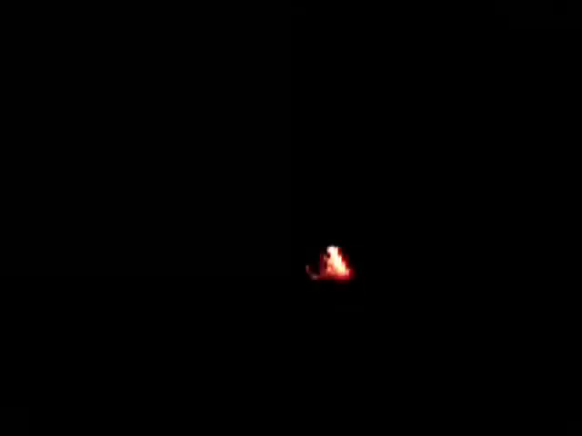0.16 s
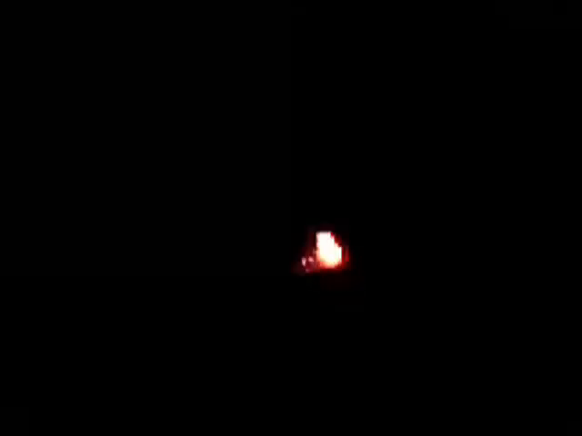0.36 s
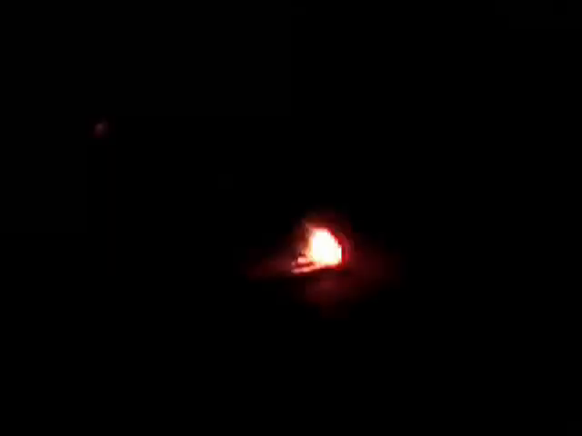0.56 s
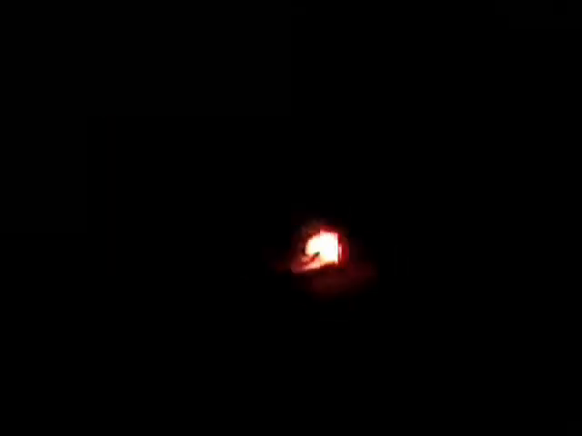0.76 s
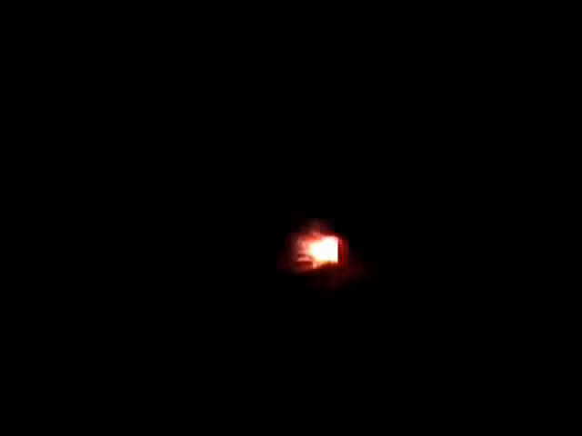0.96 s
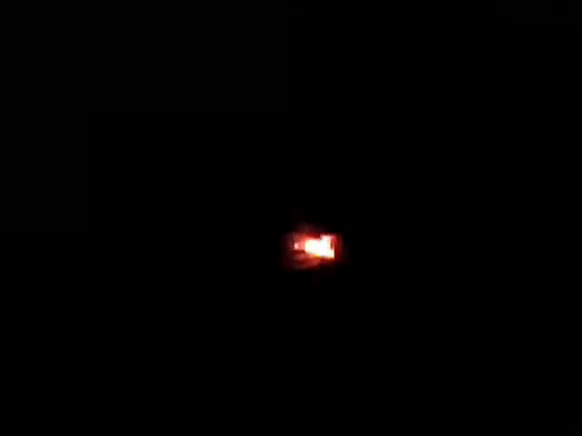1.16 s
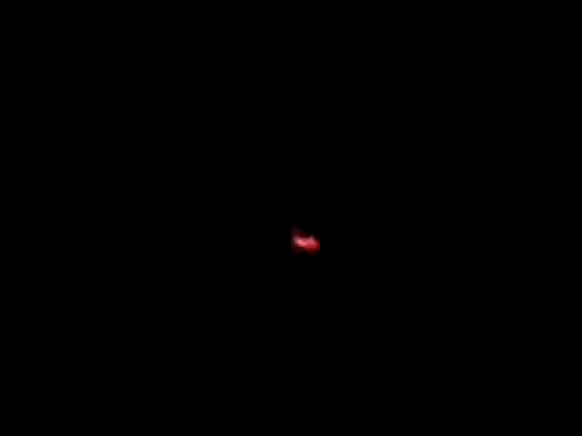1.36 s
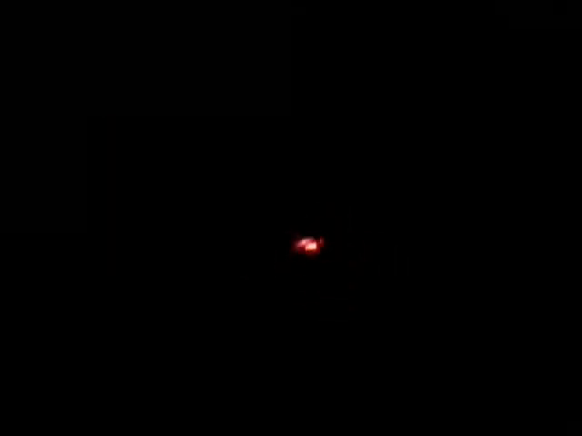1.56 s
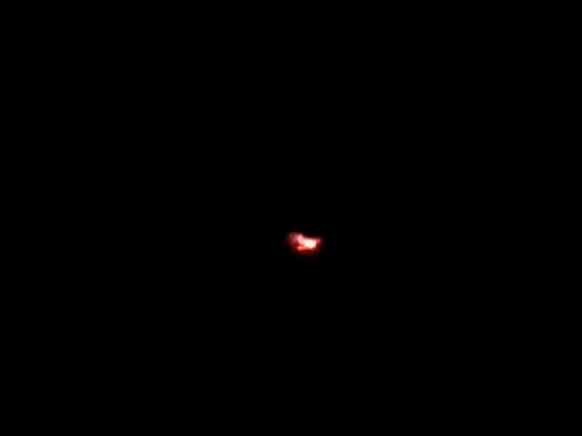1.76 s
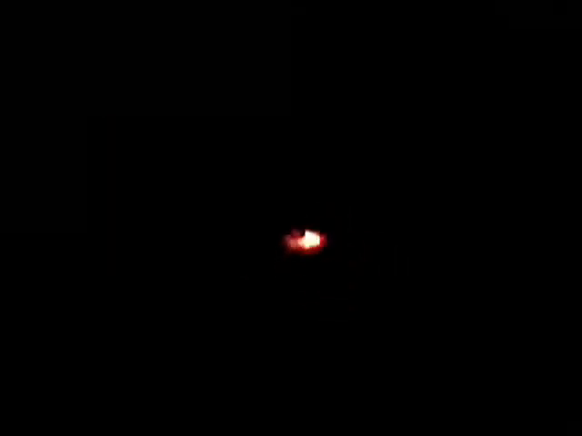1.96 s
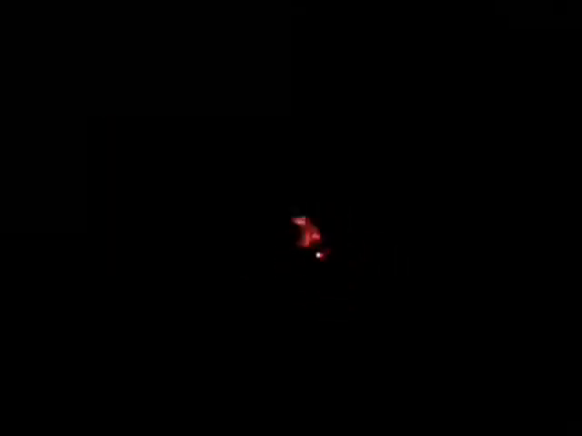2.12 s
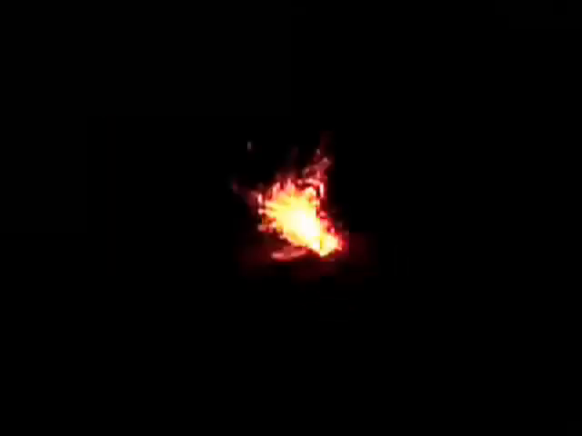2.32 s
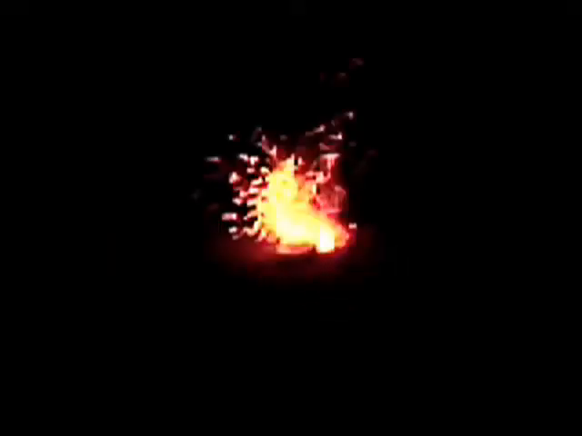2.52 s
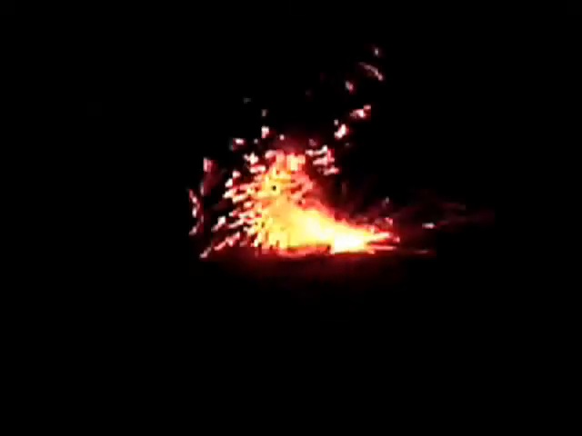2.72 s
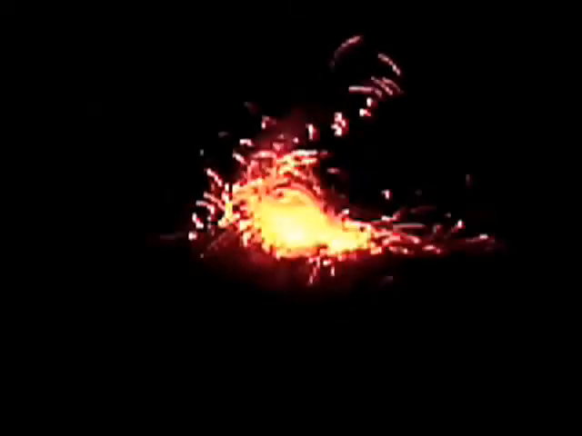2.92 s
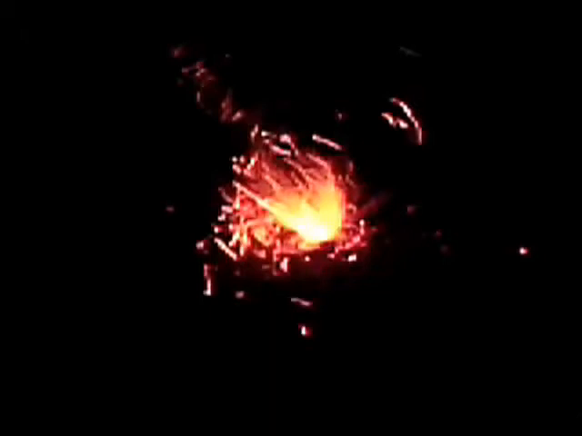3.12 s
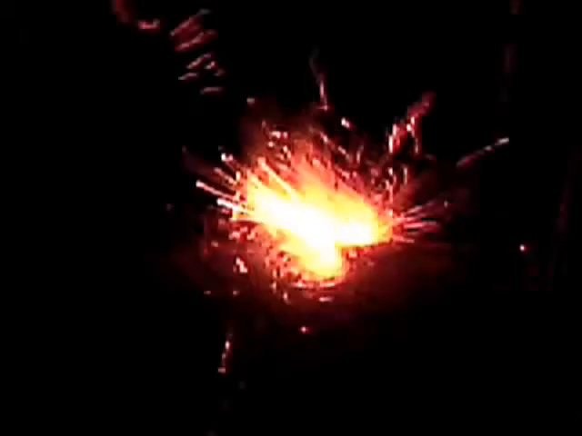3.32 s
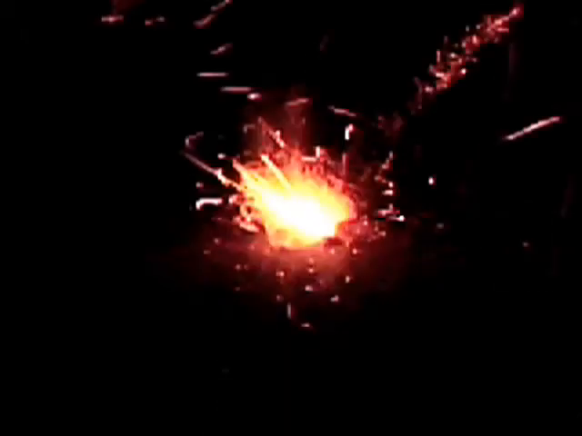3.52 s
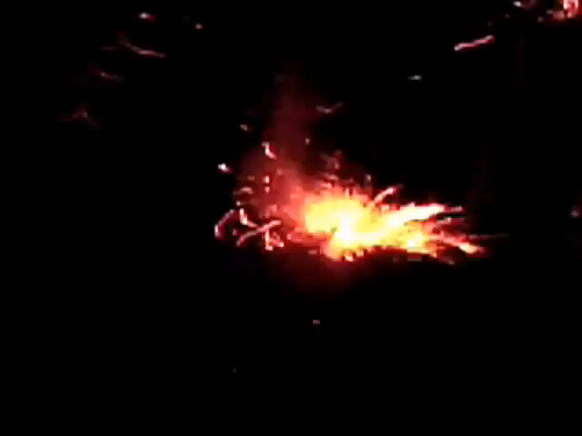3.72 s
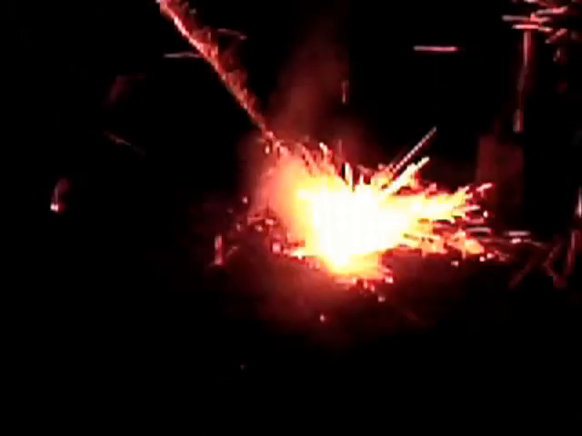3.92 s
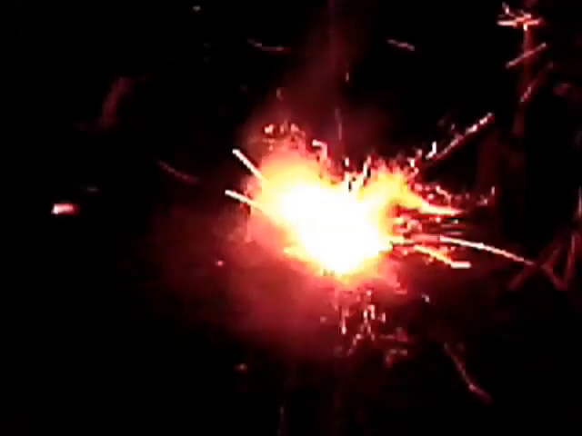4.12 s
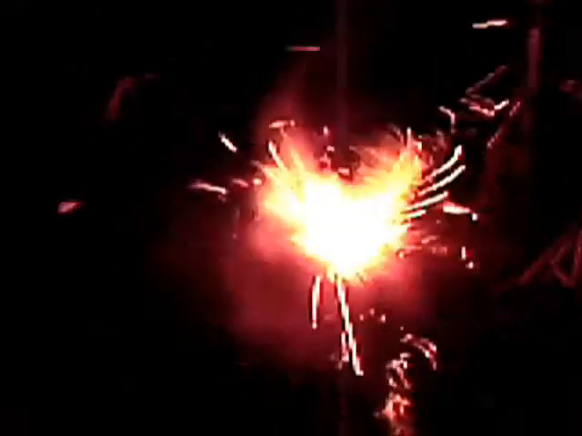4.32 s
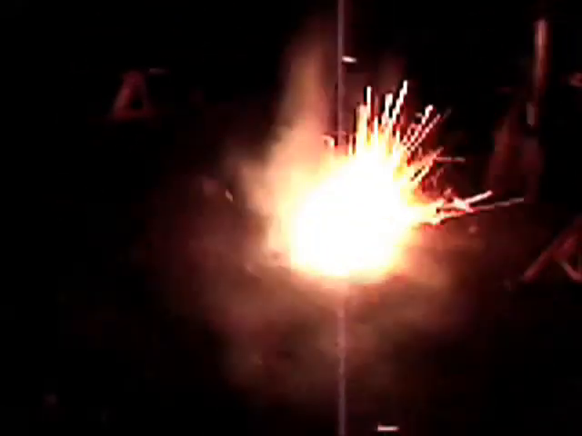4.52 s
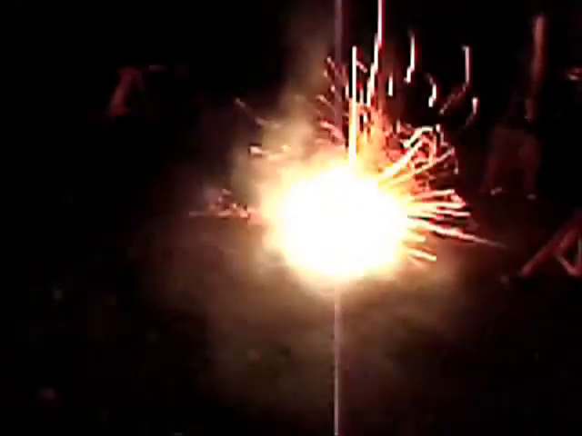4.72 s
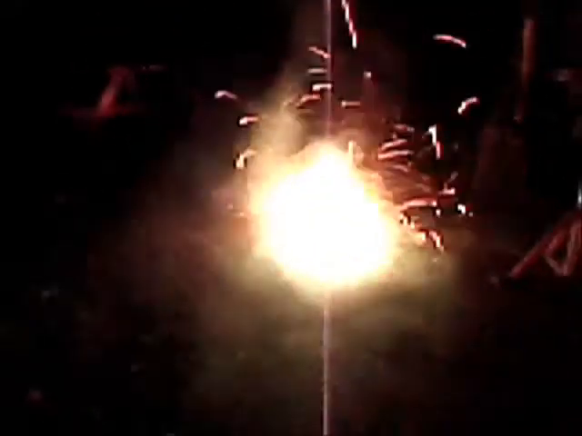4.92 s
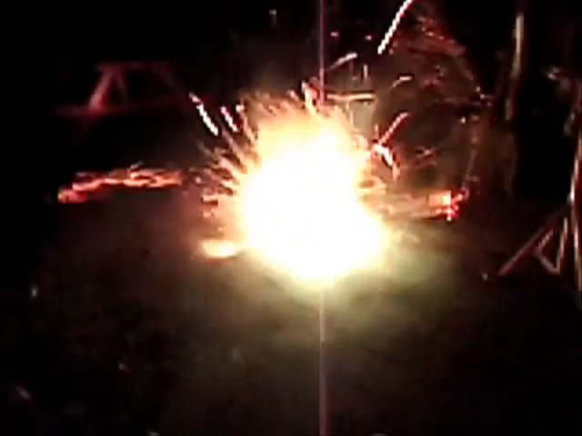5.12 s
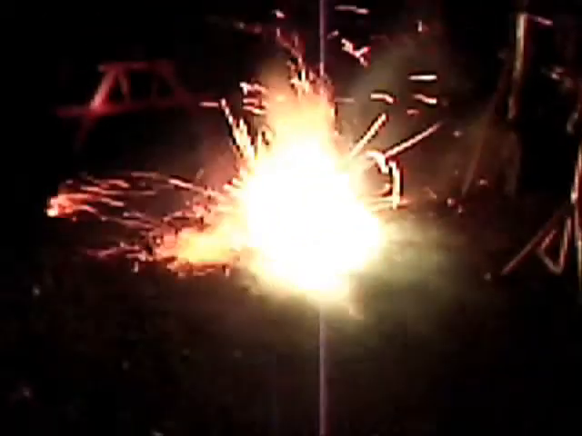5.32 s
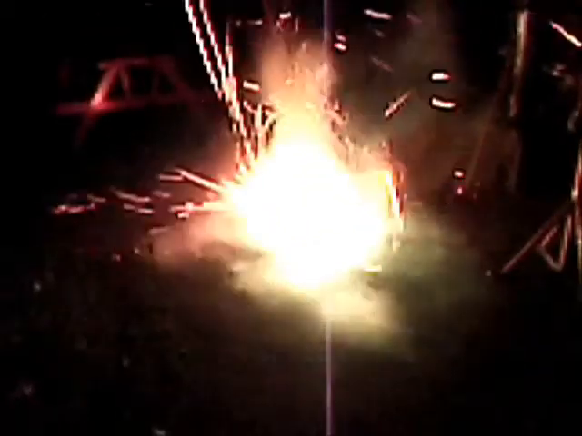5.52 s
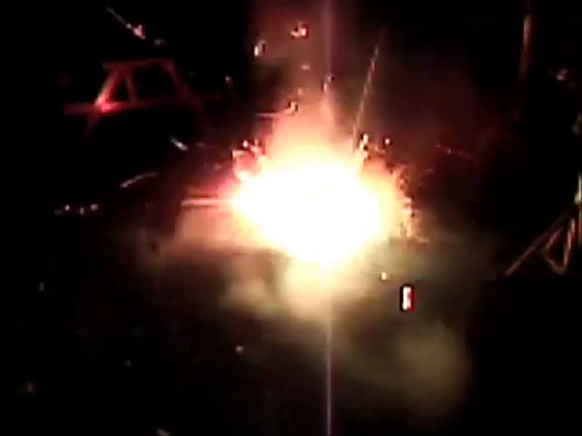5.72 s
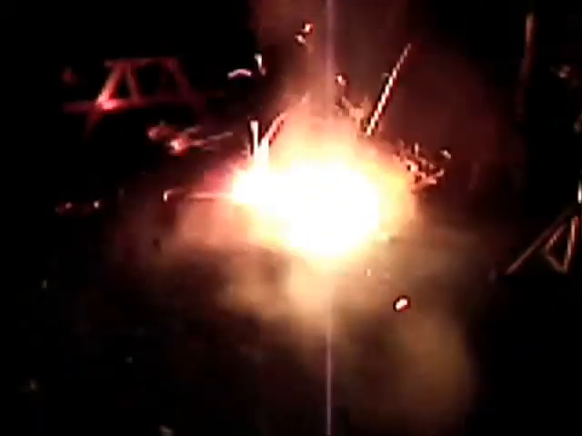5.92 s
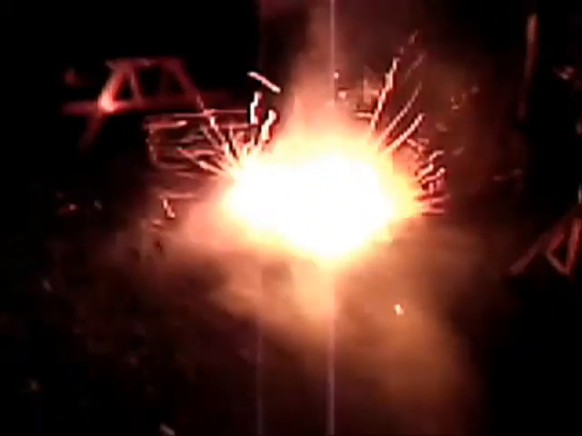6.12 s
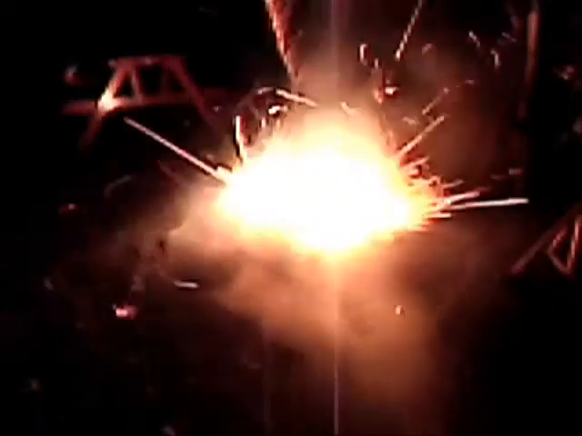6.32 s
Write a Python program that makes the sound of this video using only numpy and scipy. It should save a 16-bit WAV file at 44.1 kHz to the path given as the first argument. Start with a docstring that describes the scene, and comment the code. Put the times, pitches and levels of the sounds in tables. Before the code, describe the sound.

Quiet camera noise, then a sudden loud crack and a dense string of distorted firecracker bangs outdoors, echoing off nearby walls until cut off.

```python
"""Firecrackers in a yard at night

A ring of firecrackers goes off a few metres from a small camcorder.
At first only its hiss, motor whine and throbbing hum; then bang after bang, each a shock front with a rough
noise burst. Shaped noise makes the echoes from nearby walls and the roll over the neighbourhood; a few
strong early echoes are played like bangs. The loud ones overload the narrow-band microphone."""
import sys
import numpy as np
from scipy import signal
from scipy.fft import rfft, irfft
from scipy.io import wavfile

SR = 44100
rng = np.random.default_rng(int(sys.argv[2]) if len(sys.argv) > 2 else 0)


def inscribe(sig):
    """Save sig as 16-bit PCM at rate SR to the path in sys.argv[1].

    A 1-D sig is mono; a 2-D sig holds one channel per row.
    Samples are clipped to [-1, 1] before scaling.
    """
    pcm = np.round(np.clip(np.atleast_2d(sig).T, -1, 1) * 32767)
    wavfile.write(sys.argv[1], SR, pcm.astype(np.int16))


N = 280917
T = np.arange(N) / SR  # time in seconds


def undb(db):
    """Turn decibels into a gain."""
    return 10 ** (np.asarray(db) / 20)


def unit(x):
    """Scale a sound to unit energy."""
    return x / np.sqrt(np.sum(x ** 2))


def tone(points, bass_db=0, treble_db=0):
    """Make a unit-energy filter that starts at once, from a loudness outline plus bass and treble shelves."""
    size = 2048
    f = np.maximum(np.arange(size // 2 + 1) * SR / size, 1)
    hz, outline_db = np.transpose(points)
    db = np.interp(np.log(f), np.log(hz), outline_db)
    db = db + bass_db / (1 + (f / 330) ** 4)
    db = db + treble_db / (1 + (1300 / f) ** 4)
    # above the last point the sound falls by a further 24 dB per octave
    db = db - 24 * np.maximum(np.log2(f / hz[-1]), 0)
    # keeping half of the cepstrum gives minimum phase: no sound before the start
    cepstrum = irfft(np.log(undb(db)))
    cepstrum[size // 2:] = 0
    response = irfft(np.exp(2 * rfft(cepstrum)))
    return unit(response[:size // 2])


def lowpass(x, hz):
    """Remove the treble steeply, without delay."""
    return np.convolve(x, signal.firwin(101, hz, fs=SR), "same")


def highpass(x, hz):
    """Remove the bass with a second-order filter."""
    return signal.sosfilt(signal.butter(2, hz, "high", fs=SR, output="sos"), x)


def fade(t, t60):
    """Die away exponentially, 60 dB down after t60 seconds."""
    return np.exp(-np.log(1000) * t / t60)


def add(track, s, sound):
    """Mix a sound into a track at s seconds."""
    i = int(s * SR)
    track[i:i + len(sound)] += sound[:max(N - i, 0)]


def walk(rate):
    """Drift at random with a spread near 1, in straight lines between 'rate' new values a second."""
    knots = rng.standard_normal(256)
    return np.interp(T * rate, np.arange(len(knots)), knots)


# Colour of the steady hiss. Each row: frequency in Hz, relative level in dB per Hz.
HISS_COLOUR = [(30, 0), (130, -0.5), (210, -4), (500, -4.5), (880, -3.5), (1060, -7), (1200, -6),
               (1400, -9.5), (1650, -4.5), (1950, -8.5), (2150, -11.5), (3500, -13.5), (4300, -22)]


def camera_hiss(level_db=-35.5):
    """Random noise through a filter gives a hiss whose level drifts very slightly."""
    noise = rng.standard_normal(N)
    level = undb(level_db + 0.12 * walk(4.4))
    return level * signal.fftconvolve(noise, tone(HISS_COLOUR))[:N]


# Tones of the camera's motor. Each row: frequency in Hz, average level in dB.
MOTOR_TONES = [(883, -53.5), (1174.1, -48), (1762.3, -42), (2348.2, -55), (2712.6, -59), (3524.5, -54),
               (4475.6, -63.5)]


def motor_whine():
    """Sine tones share one slightly uneven clock, so their pitches flutter together."""
    clock = np.cumsum(1 + .0003 * walk(8)) / SR
    whine = np.zeros(N)
    for hz, db in MOTOR_TONES:
        level = np.sqrt(2) * undb(db + walk(11))
        whine += level * np.sin(2 * np.pi * hz * clock)
    return whine


def drive_hum(level_db=-39.5, top_hz=374, sag_hz=40, wander_hz=8, turn_s=.155, first_swell_s=.072):
    """A soft hum swells and lifts in pitch once per turn of the camera's drive."""
    swell = np.cos(np.pi * (T - first_swell_s) / turn_s) ** 6
    hz = top_hz - sag_hz * (1 - swell) + wander_hz * walk(6)
    hum = np.sin(2 * np.pi * np.cumsum(hz) / SR)
    return undb(level_db) * swell * np.sqrt(2) * hum


def camera():
    """The camera's own noise is hiss, motor whine and drive hum together."""
    return camera_hiss() + motor_whine() + drive_hum()


# Colour of the far roll. Each row: frequency in Hz, relative level in dB.
FAR_COLOUR = [(30, -43.5), (120, -14.5), (350, -5), (520, -7.5), (720, 4), (1200, -4.5), (1800, 3.5),
              (2200, -6.5), (3600, -3), (4600, -15.5)]


def far_roll(t60_s=16, patchy_db=0.5, rise_s=0.3, release_s=.4):
    """The neighbourhood's answer builds up, lingers in uneven clumps and is gone after three seconds."""
    t = T[:3 * SR]
    clumps = undb(patchy_db * walk(35)[:len(t)])
    envelope = fade(t, t60_s) * (1 - np.exp(-t / rise_s)) * clumps
    envelope = envelope * np.minimum((t[-1] - t) / release_s, 1)
    noise = unit(rng.standard_normal(len(t)) * envelope)
    return signal.fftconvolve(noise, tone(FAR_COLOUR))


# Echoes from nearby walls. Each row: delay in seconds, level in dB beside the start of the
# yard's smooth decay, smear time in seconds.
WALL_ECHOES = [(.001, -17.5, 0.0087), (0.0135, -3.5, .004), (0.022, -2.5, 0.014), (0.051, -4.5, 0.0083),
               (0.077, -5.5, 0.0013), (0.114, -15.5, 0.0079)]


def yard_envelope(t60_s=0.56, patchy_db=2):
    """Sound returns in a burst from each wall, over a clumpy decay of scattered sound."""
    t = T[:SR // 2]
    clumps = undb(patchy_db * walk(229.4)[:len(t)])
    power = (fade(t, t60_s) * clumps) ** 2
    for delay, db, smear in WALL_ECHOES:
        burst = undb(db) * np.exp(-np.abs(t - delay) / smear)
        power = power + (t >= delay) * burst ** 2
    return unit(np.sqrt(power))


# Colour of the ring between the walls. Each row: frequency in Hz, relative level in dB.
YARD_COLOUR = [(30, -27), (100, -15), (210, -10.5), (235, -4), (265, -9.5), (540, -7), (660, -2),
               (930, -1.5), (1180, -7), (1750, -3.5), (2150, -13.5), (2600, -12.5), (3600, -13.5),
               (4600, -22.5)]


def yard_echo(scatter, envelope, bass_db, treble_db, air_t60_s=1.84, air_hz=1760):
    """Noise makes the echoes; air and soft ground take the treble out of the later ones."""
    dull = lowpass(scatter, air_hz)
    treble_left = fade(T[:len(envelope)], air_t60_s)
    echoes = envelope * (dull + treble_left * (scatter - dull))
    return signal.fftconvolve(echoes, tone(YARD_COLOUR, bass_db, treble_db))


def shock(front=0.44, rise_s=0.00049, t60_s=0.034):
    """A sharp pressure front comes first, then a short burst of rough, tearing gas."""
    t = T[:2048]
    envelope = fade(t, t60_s) * (1 - np.exp(-t / rise_s))
    burst = unit(rng.standard_normal(len(t)) * envelope)
    burst[0] -= front
    return burst


# Colour of the direct blast. Each row: frequency in Hz, relative level in dB.
BLAST_COLOUR = [(30, -38.5), (100, -5.5), (230, 7), (400, 3.5), (750, 5), (1000, 8), (1300, -4), (1750, 6),
                (2150, -9), (3600, -4), (4600, -22.5)]


def direct_blast(bass_db, treble_db):
    """The shock reaches the microphone without the yard's ring, coloured by its weight and brightness."""
    return signal.fftconvolve(shock(), tone(BLAST_COLOUR, bass_db, treble_db))


def brightness(gap_s, bass_db, lone_db=-4.5, close_db=2.5, pause_s=0.22, steepness=6):
    """Treble in dB: a sound after a pause is dull, one close behind another is bright."""
    treble_db = lone_db + (close_db - lone_db) / (1 + (gap_s / pause_s) ** steepness)
    # a heavy bang spreads upward too; a light one keeps to the mids
    return treble_db + 0.47 * bass_db


# The bangs and a few strong early echoes, in order. Each row: start in seconds, blast in dB,
# level sent round the yard and the neighbourhood in dB, bass in dB.
# The three overall levels in crackers() are added to these.
BANGS_AND_EARLY_ECHOES = [ (2.3822, 17.5, -3, -7), (2.537, 2, -1.5, -13.5), (2.7394, 3.5, -1.5, -6),
                          (2.8269, -2, -1.5, 2.5), (2.849, 1, -3.5, -22), (3.024, 4, -6, -6.5),
                          (3.157, -11, 0, -9.5), (3.231, -12, 0, -0.5), (3.3442, 0, 2, -2),
                          (3.5, -0.5, -2.5, 3.5), (3.525, -25, -3, -9), (3.7455, 0.5, -2.5, -4),
                          (3.8157, -0.5, 0, -6.5), (3.877, -8, -3.5, 6), (3.9522, 0.5, -2.5, -8.5),
                          (4.02, -1, -4, -2), (4.185, -1, -4, -4), (4.334, -1.5, -1.5, -11.5),
                          (4.432, 0.5, -18, -6), (4.451, -1, 0, -4.5), (4.6513, -1, 0, -4),
                          (4.766, -2.5, -2, -2), (5.0013, 2, -3, -10), (5.0652, -9, -0.5, 1),
                          (5.126, -11, -5, 13), (5.1710, -16, -3, -4), (5.3440, 3, -0.5, 8),
                          (5.402, -9, -9, 7), (5.523, 4, -5.5, -20), (5.5867, 2.5, -6, -0.5),
                          (5.7047, -3, -3, -1), (5.7521, -15, 0.5, -2.5), (5.794, -18, -1, -29),
                          (5.8775, 0, -2.5, -8.5), (5.9268, 2, -7, -5.5), (6.1193, -13, 1, -4.5),
                          (6.23, -1, -1.5, -1.5), (6.256, -3, -0.5, -5)]


def crackers(blast_level_db=17.5, yard_level_db=29, far_level_db=15, kinship=0.69):
    """Each bang or strong early echo sounds as a blast, then scattered by the yard, then from far-off houses."""
    out, shots = np.zeros(N), np.zeros(N)
    envelope = yard_envelope()
    scatter = rng.standard_normal(len(envelope))
    gaps = np.diff([row[0] for row in BANGS_AND_EARLY_ECHOES], prepend=0)
    for (s, blast_db, yard_db, bass_db), gap_s in zip(BANGS_AND_EARLY_ECHOES, gaps):
        treble_db = brightness(gap_s, bass_db)
        # neighbours lie close together, so their echoes are alike;
        # the fire creeps round the ring, so the pattern changes a little with each row
        fresh = rng.standard_normal(len(envelope))
        scatter = kinship * scatter + np.sqrt(1 - kinship ** 2) * fresh
        blast = direct_blast(bass_db, treble_db)
        echo = yard_echo(scatter, envelope, bass_db, treble_db)
        add(out, s, undb(blast_level_db + blast_db) * blast)
        add(out, s, undb(yard_level_db + yard_db) * echo)
        # one single click per row sets off the far roll
        add(shots, s, undb([yard_db]))
    return out + undb(far_level_db) * signal.fftconvolve(shots, far_roll())[:N]


def scene():
    """The bangs sound over the camera's own noise."""
    return (camera() + crackers())[None]


def record(dry, ceiling=0.93, give=0.086, lean=-0.085, knee=14, low_hz=24, mic_top_hz=4670, top_hz=15600,
           fizz_db=-11, fizz_hz=12000, fizz_drive=1.44):
    """The preamplifier saturates lopsidedly, the band is cut above the mids, and overshooting peaks are clipped."""
    x = lowpass(highpass(dry[0], low_hz), mic_top_hz)
    # 'lean' makes the two sides bend differently; 'give' lets some of the wave through unbent
    driven = ceiling * (np.tanh(x / ceiling + lean) - np.tanh(lean)) + give * x
    # the sharp corners of the overloaded wave get through as a faint treble fizz
    fizz = undb(fizz_db) * highpass(np.tanh(fizz_drive * x), fizz_hz)
    x = lowpass(driven, mic_top_hz) + fizz
    x = x / (1 + np.abs(x) ** knee) ** (1 / knee)
    return signal.sosfilt(signal.ellip(8, .2, 70, top_hz, fs=SR, output="sos"), x)[None]


dry = scene()
out = record(dry)
inscribe(out)
```